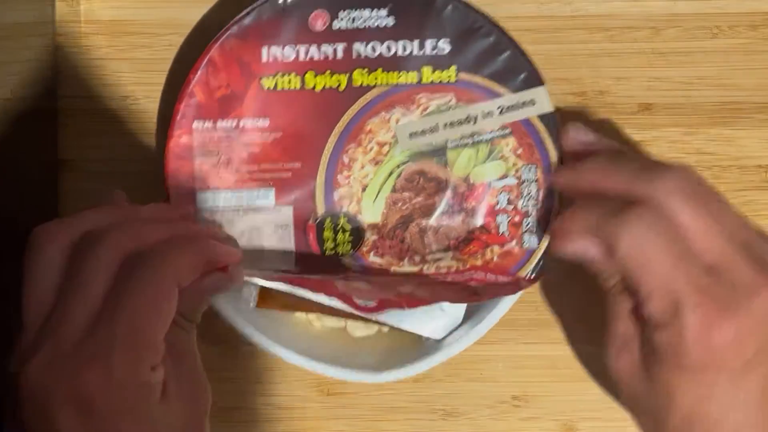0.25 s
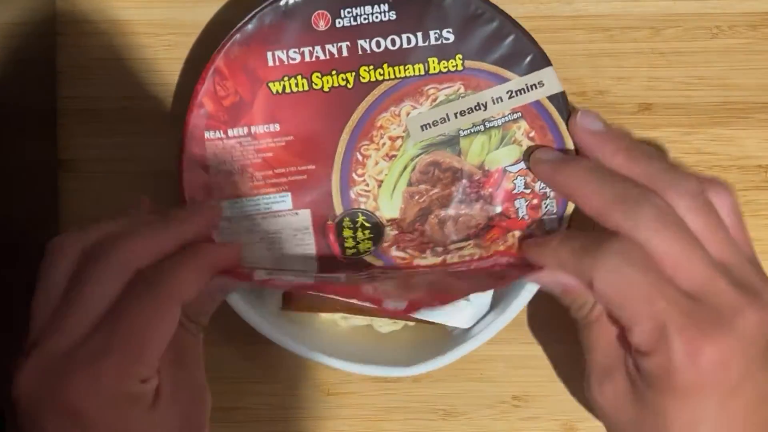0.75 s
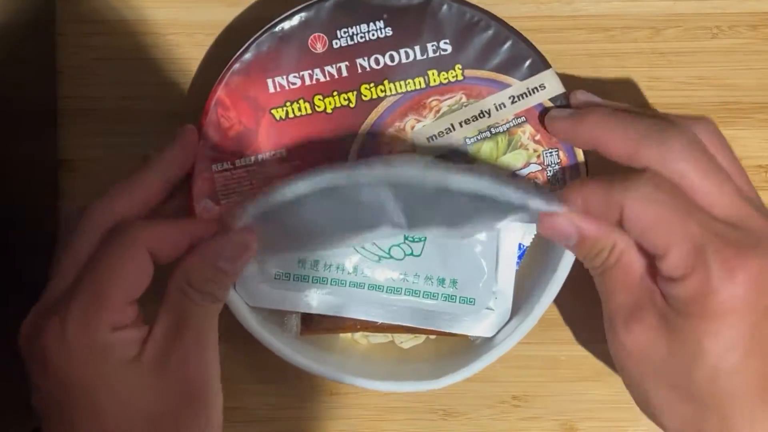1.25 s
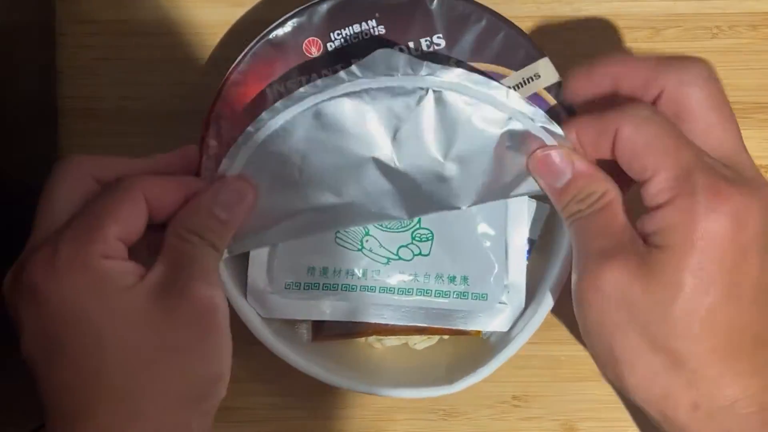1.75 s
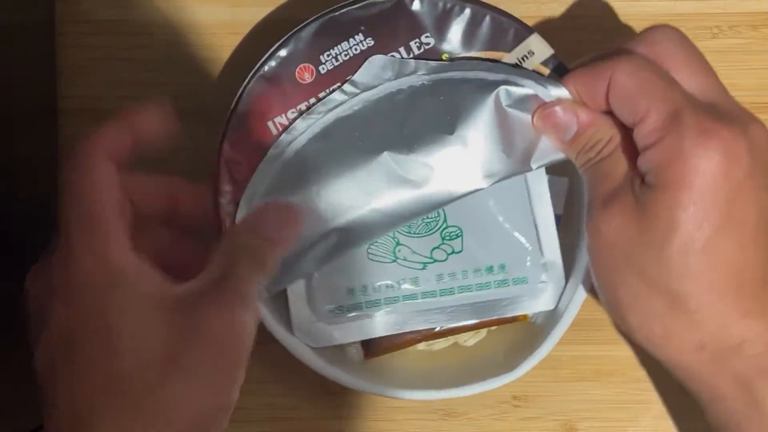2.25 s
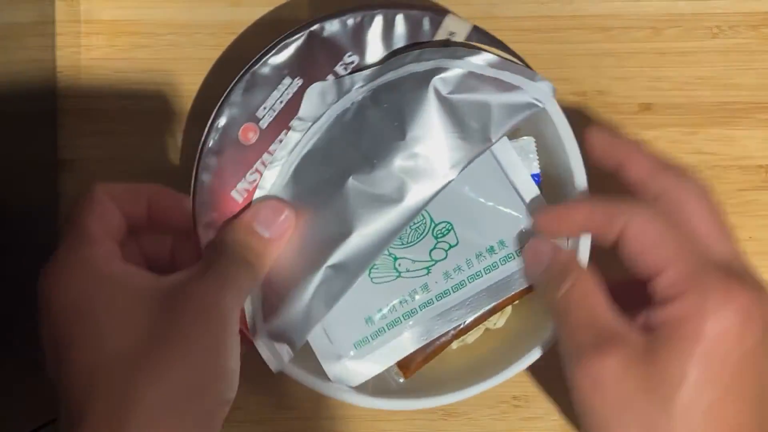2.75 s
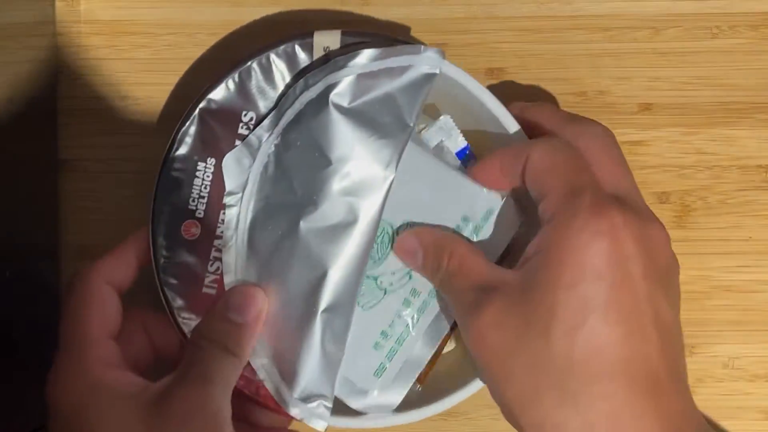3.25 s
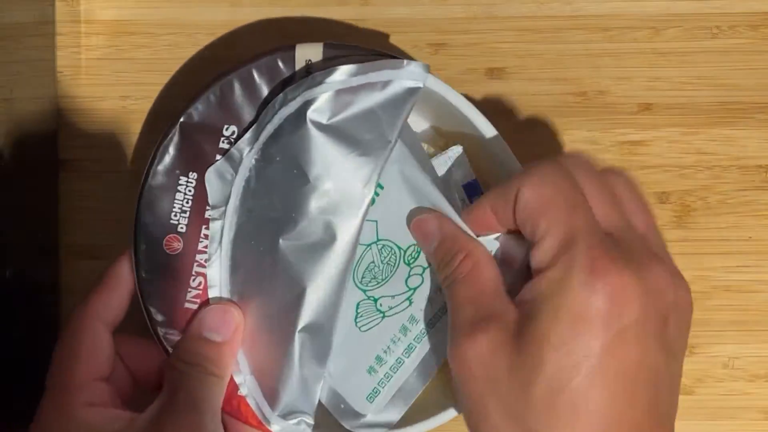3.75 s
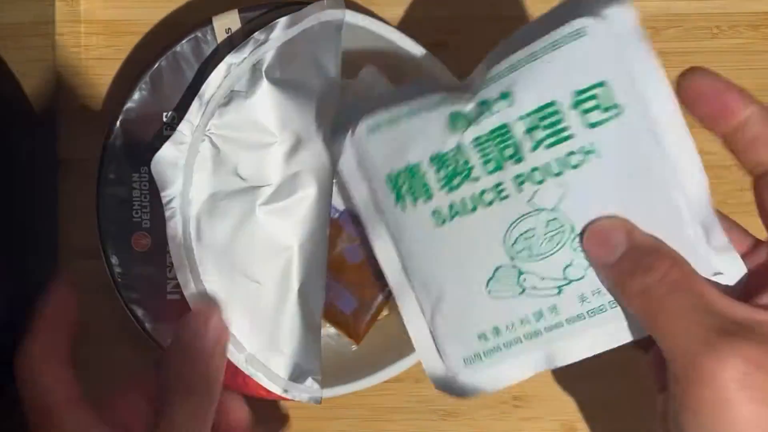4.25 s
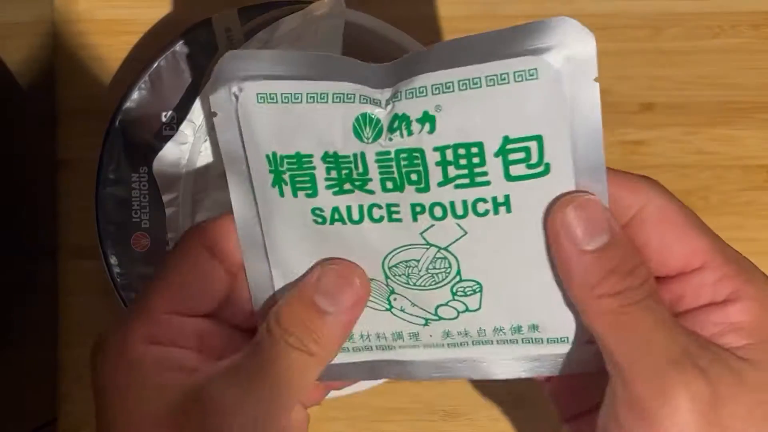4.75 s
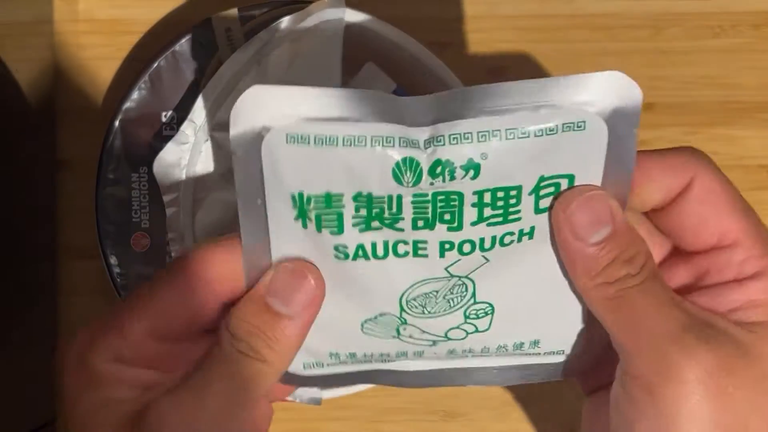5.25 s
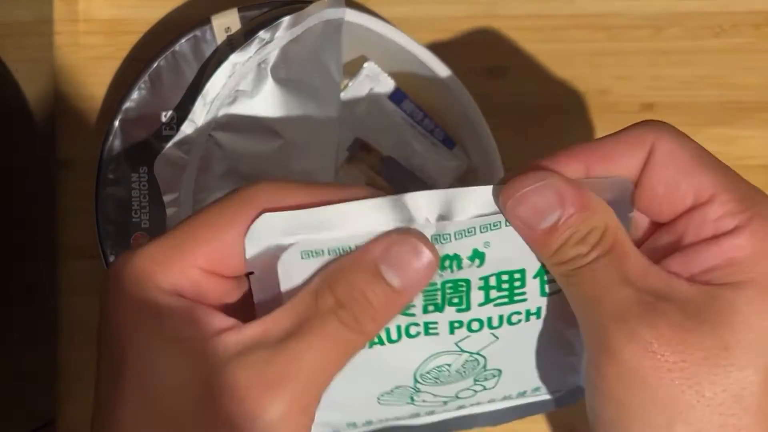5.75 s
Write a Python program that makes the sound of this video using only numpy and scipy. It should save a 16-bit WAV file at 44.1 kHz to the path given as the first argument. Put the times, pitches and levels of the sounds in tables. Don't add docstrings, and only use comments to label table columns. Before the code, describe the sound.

Close up on a wooden table, a foil-lined lid is peeled from a paper bowl: dense bright crackling, sharp snaps and dull hollow knocks. The bowl slides briefly as it is turned. A foil sachet is then pulled out in a loud crinkling burst and handled quietly with small ticks. Small dry room, faint low hum, close hand-held stereo microphone.

```python
import sys
import numpy as np
from scipy import signal
from scipy.fft import rfft, irfft, next_fast_len
from scipy.io import wavfile

SR = 44100
rng = np.random.default_rng(int(sys.argv[2]) if len(sys.argv) > 2 else 0)


def store_pcm(level_fs):
    pcm = np.round(np.clip(level_fs, -1, 1) * 32767).astype(np.int16)
    wavfile.write(sys.argv[1], SR, np.atleast_2d(pcm).T)


def volts_from_db(level):
    exponent = np.asarray(level, float) / 20
    return 10 ** exponent


N = 264159
PAD = next_fast_len(N + 2000)


def rms_one(x):
    return x / np.sqrt(np.mean(x ** 2) + 1e-20)


def coloured(x, points):
    hz, level_db = np.transpose(points)
    bins = np.arange(PAD // 2 + 1) * SR / PAD + 1
    gain = volts_from_db(np.interp(np.log(bins), np.log(hz), level_db, left=-90, right=-90))
    return rms_one(irfft(rfft(x, PAD) * gain, PAD)[:, :N])


def drift(rate):
    r = np.exp(-80 * np.pi * rate / SR)
    noise = rng.standard_normal(N // 40 + 2002)
    slow = signal.lfilter([1], [1, -2 * r, r * r], noise)[2000:]
    return np.interp(np.arange(N) / 40, np.arange(len(slow)), rms_one(slow))


def resonance(x, hz, width):
    r = np.exp(-np.pi * width / SR)
    top = np.array([1, 0, -1]) * (1 - r * r) / 2
    return signal.lfilter(top, [1, -2 * r * np.cos(2 * np.pi * hz / SR), r * r], x)


def crackle(per_s, spread_db, smear_s, clump_db):
    sizes = volts_from_db(2 * spread_db * np.minimum(rng.exponential(1, N), 3.2))
    born = rng.random(N) < per_s / SR
    fade = np.exp(-2 / (smear_s * SR))
    power = signal.lfilter([1], [1, -fade], sizes * born + 1e-18)
    return np.sqrt(power) * volts_from_db(clump_db * drift(23)) * rng.standard_normal((2, N))


def patchwork(edges_hz, per_s, spread_db, cycles, clump_db):
    out, together = 0, volts_from_db(clump_db * drift(29.4))
    for low, high in zip(edges_hz, edges_hz[1:]):
        band = signal.butter(1, [low, high], "band", fs=SR, output="sos")
        grains = rms_one(crackle(per_s, spread_db, cycles / low, clump_db))
        out = out + signal.sosfilt(band, grains)
    return out * together


# (frequency [Hz], density [dB per Hz])
RUMBLE = [(15, -17.5), (25, -17), (60, 6), (119, -7.5), (253, -10.5), (592, -21), (854, -22), (1700, -32),
          (2190, -28), (4990, -46), (8000, -51), (11000, -57), (13200, -70)]
# (frequency [Hz], width [Hz], level [dB])
MACHINES = [
    (51.3, 13.4, -62),
    (245.4, 6.6, -64.5),
]
RUMBLE_DB = -55


def room_tone():
    tone = volts_from_db(RUMBLE_DB + 0.54 * drift(6.8)) * coloured(rng.standard_normal((2, N)), RUMBLE)
    for hz, width, level_db in MACHINES:
        pitch = hz + 0.455 * width * drift(13.7)
        hum = rms_one(np.sin(2 * np.pi * np.cumsum(pitch) / SR))
        tone += volts_from_db(level_db) * hum * volts_from_db(2.0 * drift(9.0)) * [[1], [.1]]
    return tone


# (centre [s], half length [s], level [dB])
BOWL_SHIFTS = [
    (0.756, 0.055, -43),
    (1.814, 0.12, -59),
    (2.623, 0.042, -46),
    (2.706, 0.064, -56),
    (2.87, 0.36, -47.5),
    (3.174, 0.021, -42),
    (3.372, 0.012, -36.5),
    (3.552, 0.034, -51),
    (5.14, 0.12, -63),
]
# (frequency [Hz], width [Hz], level [dB])
BOWL_SLIDE_TONES = [
    (680, 360, -6),
    (2500, 1900, -9.5),
]


def shifts():
    t, white = np.arange(N) / SR, rng.standard_normal((2, N))
    tone = 0
    for hz, width, level_db in BOWL_SLIDE_TONES:
        tone = tone + volts_from_db(level_db) * rms_one(resonance(resonance(white, hz, width), hz, width))
    swell = sum(volts_from_db(db) * np.exp(-((t - s) / half_s) ** 2) for s, half_s, db in BOWL_SHIFTS)
    return tone * swell * volts_from_db(0.81 * drift(15))


# (time [s], rustle level [dB])
IDLE_GRIP = [(0, -62), (0.6, -45), (1.1, -46), (1.6, -49.5), (2.0, -54), (2.15, -52.5), (2.3, -58),
             (2.6, -56), (3.0, -50), (3.15, -61), (3.55, -56), (3.66, -67), (3.72, -60), (4.1, -63),
             (4.3, -50), (4.42, -65.5), (4.72, -68), (4.8, -77), (4.9, -71), (4.95, -78), (5.03, -84),
             (5.05, -68), (5.4, -70), (5.7, -60.5), (5.99, -59)]
# (centre [s], half length [s], rustle level [dB], fingertip hiss re rustle [dB])
PEEL_STROKES = [(0.0, 0.22, -42.5, -18), (0.235, 0.074, -28, -18), (0.438, 0.048, -40.5, -16.5),
                (0.816, 0.094, -30.5, -17.5), (0.848, 0.054, -27.5, -16.5), (0.891, 0.035, -30.5, -17),
                (1.29, 0.25, -41.5, -37), (1.393, 0.24, -38, -15.5), (1.631, 0.082, -45.5, -13.5),
                (1.776, 0.057, -35, -38), (1.851, 0.18, -39.5, -25.5), (2.17, 0.069, -40, -22.5),
                (2.43, 0.1, -40, -19), (2.455, 0.063, -39, -19), (2.64, 0.11, -43.5, -36),
                (2.85, 0.21, -52, -20)]
# (centre [s], half length [s], rustle level [dB], fingertip hiss re rustle [dB])
TURN_STROKES = [(3.268, 0.092, -36, -27), (3.426, 0.1, -38, -28), (3.73, 0.03, -46, -20),
                (3.775, 0.1, -39, -25), (3.826, 0.06, -32, -22), (3.929, 0.056, -22.5, -22.5),
                (4.0, 0.023, -37, -26), (4.07, 0.12, -40.5, -42), (4.15, 0.06, -52, -5.5),
                (4.228, 0.046, -44, -25), (4.62, 0.07, -59.5, -7), (4.869, 0.05, -62, -12),
                (5.08, 0.04, -64, -8), (5.13, 0.07, -64.5, -7.5), (5.175, 0.04, -64, -10),
                (5.251, 0.016, -58, -6.5), (5.385, 0.031, -68.5, 2), (5.51, 0.036, -71, 1),
                (5.59, 0.13, -51, -25), (5.75, 0.0094, -46.5, -35), (5.909, 0.052, -48, -12)]
STROKE_FALL_DB, STROKE_SHAPE = 15.5, 1.28
GRIP_HISS_DB = -20.5


def hands():
    t = np.arange(N) / SR
    rustle_power = volts_from_db(2 * np.interp(t, *np.transpose(IDLE_GRIP)))
    hiss_power = rustle_power * volts_from_db(2 * GRIP_HISS_DB)
    for s, half_s, level_db, hiss_db in PEEL_STROKES + TURN_STROKES:
        near = slice(max(round((s - .4) * SR), 0), round((s + .4) * SR))
        distance = np.abs((t[near] - s) / half_s)
        swell = volts_from_db(2 * (level_db - STROKE_FALL_DB * distance ** STROKE_SHAPE))
        rustle_power[near] += swell
        hiss_power[near] += swell * volts_from_db(2 * hiss_db)
    return 10 * np.log10(rustle_power), 10 * np.log10(hiss_power)


# (frequency [Hz], level [dB])
FOIL_COLOUR = [(700, -18.5), (1200, 5), (2200, 14.5), (3200, 10), (4500, 3), (6000, 1.5), (8000, -5.5),
               (12000, -63.5)]
# (frequency [Hz], level [dB])
BOWL_COLOUR = [(130, 2.5), (250, 3), (430, 2), (650, 2), (900, 0), (1300, 0.5), (2000, -4.5)]
# (frequency [Hz], level [dB])
SKIN_COLOUR = [(3000, 3.5), (5000, 2), (8000, 2), (11000, -2), (14000, 0.5), (16000, -6.5)]
RUB_DB, RUB_FOLLOWS = -50, 0.75


def rustle():
    foil_db, skin_db = hands()
    bowl_db = RUB_DB + RUB_FOLLOWS * (foil_db + 49.5)
    folds = patchwork([700, 1300, 2100, 3200, 4800, 7500, 12000], 780, spread_db=9.0, cycles=27.0, clump_db=1.5)
    rubbing = patchwork([130, 350, 600, 1000, 2000], 280, spread_db=3.5, cycles=4.1, clump_db=2.5)
    sliding = crackle(3200, spread_db=-6.5, smear_s=0.003, clump_db=2.5)
    foil = volts_from_db(foil_db - 7.0) * coloured(folds, FOIL_COLOUR)
    bowl = volts_from_db(bowl_db - 5.0) * coloured(rubbing, BOWL_COLOUR)
    skin = volts_from_db(skin_db + 7.5) * coloured(sliding, SKIN_COLOUR)
    return foil + bowl + skin


# (centre [s], half length [s], level [dB], centre frequency [Hz])
SQUEEZES = [(0.14, 0.019, -45, 890), (0.21, 0.025, -64, 2600), (0.398, 0.016, -43.5, 1440),
            (0.43, 0.018, -48.5, 2300), (1.012, 0.013, -42, 2720), (1.273, 0.032, -53, 2100),
            (1.344, 0.007, -44.5, 3100), (2.198, 0.028, -56, 2600), (3.178, 0.016, -40, 3100),
            (3.246, 0.0055, -28.5, 1150), (3.245, 0.009, -36, 2900), (3.425, 0.032, -38, 1250),
            (3.818, 0.019, -41, 4220), (4.037, 0.031, -38.5, 1650), (3.901, 0.0037, -28, 2400),
            (3.934, 0.014, -32.5, 900), (3.96, 0.0047, -40.5, 2800), (0.777, 0.0062, -40, 2700),
            (0.722, 0.018, -37.5, 550), (0.84, 0.029, -36.5, 620), (0.887, 0.008, -38, 700),
            (1.028, 0.0093, -38, 2000), (0.126, 0.018, -42.5, 540), (3.398, 0.029, -40, 1970),
            (3.544, 0.015, -46.5, 1450), (1.28, 0.023, -38, 1800), (2.565, 0.012, -46, 1800),
            (4.208, 0.017, -42.5, 1600), (1.776, 0.027, -46, 2200), (1.784, 0.0086, -48, 730),
            (2.168, 0.015, -50, 2000), (3.828, 0.024, -45.5, 4230), (4.328, 0.0089, -54.5, 2100),
            (5.583, 0.01, -53, 1170), (0.28, 0.0068, -41, 1900), (5.561, 0.008, -43.5, 770),
            (1.402, 0.012, -38.5, 2200), (5.9, 0.019, -50.5, 1300), (0.213, 0.0074, -34, 660),
            (3.26, 0.012, -39, 2300), (4.18, 0.013, -56, 1960), (4.665, 0.0039, -42, 1470),
            (5.077, 0.015, -62.5, 4230), (5.538, 0.0077, -45, 1400), (5.857, 0.032, -56.5, 5100),
            (2.82, 0.035, -50, 3000), (2.94, 0.03, -52, 2600), (2.59, 0.02, -45, 600),
            (1.299, 0.004, -31, 1900), (5.868, 0.005, -50, 5000), (2.8, 0.07, -55, 1400),
            (3.62, 0.04, -62, 1200), (2.58, 0.012, -40, 2300), (3.385, 0.015, -46, 2200),
            (3.246, 0.008, -39, 5800)]


def crumples():
    t, out = np.arange(N) / SR, np.zeros((2, N))
    swarm = rms_one(crackle(770, spread_db=2.5, smear_s=0.0028, clump_db=4.5))
    for s, half_s, level_db, centre_hz in SQUEEZES:
        near = slice(round((s - .08) * SR), round((s + .08) * SR))
        swell = np.exp(-((t[near] - s) / half_s) ** 2)
        burst = resonance(swarm[:, near], centre_hz, 0.49 * centre_hz) * swell
        out[:, near] += volts_from_db(level_db) * rms_one(burst) * np.sqrt(np.mean(swell ** 2))
    return out


# (time [s], peak [dB], bowl pitch [Hz], bowl re peak [dB], foil pitch [Hz])
LID_BUCKLES = [(0.203, -23.5, 540, -11.5, 970), (0.276, -24, 537, -45, 2050),
               (0.386, -32.5, 420, -19, 1400), (0.502, -31, 829, -34, 2500), (0.58, -31.5, 840, -22, 1210),
               (0.626, -35.5, 610, -11, 946), (0.817, -28, 613, -9.5, 2190), (1.004, -19, 291, -24, 1270),
               (1.253, -13, 650, -34, 3350), (1.296, -17, 656, -20.5, 1850), (1.307, -37, 680, 3, 2900),
               (1.38, -32.5, 477, -7, 2480), (1.393, -21.5, 500, -14.5, 2400),
               (1.568, -29.5, 533, -15, 1470), (1.815, -31, 850, -18, 2220), (2.124, -33.5, 516, -23, 2400),
               (2.147, -22.5, 500, -21.5, 2270), (2.357, -38, 660, -21, 2320),
               (2.463, -25.5, 510, -14, 1230), (2.491, -34, 330, -16, 2200), (2.566, -9, 672, -11.5, 2020)]
# (time [s], peak [dB], bowl pitch [Hz], bowl re peak
# [dB], foil pitch [Hz])
SACHET_BUCKLES = [(3.243, -22, 774, -10, 1310), (3.522, -35.5, 315, -23, 2120), (3.69, -46, 756, -9, 2860),
                  (3.765, -13.5, 576, -20, 2330), (3.872, -21.5, 607, -21, 3000),
                  (3.887, -18, 666, -16.5, 2760), (3.897, -17, 650, -13.5, 1020),
                  (3.933, -16.5, 980, -22, 1340), (3.951, -26, 790, -31, 2820),
                  (3.831, -46, 474, -24, 1240), (4.146, -16, 510, -37, 2160),
                  (4.183, -27.5, 443, -22.5, 1980), (4.203, -31, 950, -51, 1520),
                  (4.313, -36.5, 810, -35, 1420), (4.487, -36, 332, -21.5, 1180),
                  (4.661, -38.5, 920, -6.5, 1170), (5.117, -41, 464, -21.5, 1210),
                  (5.161, -37.5, 960, -19, 1220), (1.255, -17.5, 664, -25.5, 1310),
                  (5.553, -22, 700, -19, 1210), (5.61, -35, 810, -12.5, 1230), (5.797, -44, 410, -20, 1300),
                  (5.887, -29.5, 406, -25, 1480)]
# (time [s], peak [dB], bowl pitch [Hz], bowl re peak [dB], foil pitch [Hz])
EDGE_CRACKS = [(0.202, -23.5, 1000, -8.5, 2320), (0.429, -31, 600, -16, 950), (0.624, -36.5, 850, -9, 2260),
               (0.834, -27.5, 427, -7, 1890), (1.328, -9.5, 690, -29.5, 2830),
               (1.622, -32, 296, -19.5, 2620), (1.757, -33, 800, -12, 1860), (2.567, -17.5, 415, -8, 4540),
               (2.996, -36, 393, -12.5, 1959), (3.167, -29, 630, -23, 2800), (3.406, -19.5, 453, -21, 1521),
               (3.723, -31.5, 380, -16.5, 2860), (3.925, -19, 554, -13.5, 2500),
               (5.246, -43.5, 355, -21, 1190), (5.372, -48.5, 312.5, -15.5, 953),
               (5.404, -50.5, 320, -9, 2440), (5.715, -45, 960, -15, 2800), (5.865, -36, 939, -35, 3700)]
# (time [s], peak [dB], bowl pitch [Hz], bowl re peak [dB])
LID_THUMPS = [(0.038, -49.5, 363, 2.5), (0.118, -47, 553, -7), (0.233, -32, 570, -1.5),
              (0.663, -51.5, 380, 6), (0.71, -47, 533, 3.5), (0.753, -38, 414, -0.5),
              (1.089, -54.5, 570, 5.5), (1.127, -50.5, 555, 7.5), (1.201, -58.5, 740, 13.5),
              (1.475, -35, 670, -8.5), (1.603, -46.5, 298, 0), (1.676, -44, 590, 1.5),
              (1.845, -25, 285, -11.5), (1.846, -30, 750, -6), (1.857, -36.5, 302, -1.5),
              (1.87, -45, 300, -4), (1.53, -51, 500, 0), (1.912, -35.5, 480, 3), (2.182, -42.5, 370, -4.5),
              (2.416, -22, 500, -7), (3.199, -33.5, 470, -11), (3.354, -33.5, 503, -10.5),
              (3.644, -47, 289, -14), (5.897, -40.5, 483, -1.5), (5.946, -49.5, 320, -1.5)]
# (time [s], peak [dB], foil pitch [Hz])
SACHET_TICKS = [(4.401, -66, 1560), (4.62, -42.5, 1270), (4.74, -43.5, 1214), (4.851, -48, 970),
                (4.885, -54, 956), (4.96, -49, 1130), (5.221, -48.5, 1040), (5.256, -45, 1150),
                (5.474, -42.5, 1160), (5.748, -44, 1100), (5.837, -49, 2650)]
# (time [s], peak [dB], foil pitch [Hz])
FACET_FLIPS = [(0.151, -30.5, 3500), (0.192, -36, 1100), (0.204, -23.5, 3200), (0.277, -26, 3540),
               (0.58, -37, 2500), (0.819, -31, 1200), (0.838, -33, 3000), (0.886, -27, 1500),
               (0.898, -41, 2800), (1.005, -22, 3450), (1.329, -12, 4700), (1.33, -18, 3720),
               (1.334, -21, 1920), (3.873, -21.5, 1090), (3.887, -31, 3600), (3.935, -19, 3150),
               (4.032, -29, 2200), (4.084, -34, 1980), (4.147, -17.5, 1020), (4.153, -31, 3700),
               (5.535, -34.5, 2700), (5.544, -36, 2600), (5.555, -36, 3380), (5.654, -49, 1230),
               (5.733, -49, 1400), (5.749, -43, 2620), (5.866, -43, 1400), (5.887, -35, 4140),
               (5.888, -31.5, 2700), (5.966, -50, 2670), (1.844, -32, 3000), (2.148, -38, 3800),
               (3.244, -24, 2580), (3.766, -19, 1510), (3.767, -20, 3350), (3.831, -29, 1300),
               (4.147, -21, 2150), (4.651, -40, 1100), (4.662, -35.5, 2770), (4.851, -54.5, 2300),
               (4.91, -50.5, 1900), (5.162, -45, 2600), (5.555, -28, 2250), (5.496, -59, 3500)]
# (time
# [s], peak [dB], pitch [Hz])
SLIPS_AND_FLIPS = [(0.714, -40, 9000), (1.227, -41, 8500), (1.238, -38, 8890), (1.254, -27.5, 8000),
                   (1.328, -16, 8700), (1.577, -41, 9400), (1.725, -46, 10000), (1.738, -41, 10000),
                   (1.861, -40, 8500), (2.124, -42, 10000), (2.182, -38, 9000), (3.354, -46, 9000),
                   (3.708, -50, 8000), (3.766, -30.5, 8810), (3.821, -35.5, 9600), (3.898, -37, 10000),
                   (3.924, -21, 9100), (4.146, -40, 10000), (3.406, -32, 8800), (5.716, -50, 9500),
                   (3.616, -60, 9000), (0.427, -44, 9500), (0.625, -44, 9500), (1.004, -36, 9500),
                   (2.566, -30, 9500), (3.168, -42, 9500), (4.662, -50, 9000), (5.866, -48, 9500),
                   (1.912, -40, 2100), (2.414, -36, 2300), (2.461, -38, 1500), (5.425, -56, 2700),
                   (2.566, -20, 6000), (1.328, -18, 6000), (0.862, -30, 2600), (0.808, -35, 3000),
                   (0.91, -36, 2200), (0.225, -34, 2400), (0.248, -35, 3300), (0.77, -38, 3800)]
SNAP_DAMPING, THUMP_DAMPING = 0.22, 0.3


def creases():
    lid = [(*row, -61, SNAP_DAMPING) for row in LID_BUCKLES]
    sachet = [(*row, -36, SNAP_DAMPING) for row in SACHET_BUCKLES]
    cracks = [(*row, 3.5, SNAP_DAMPING) for row in EDGE_CRACKS]
    thumps = [(*row, 2050, -26, THUMP_DAMPING) for row in LID_THUMPS]
    ticks = [(s, db, 305, -16, hz, -21, SNAP_DAMPING) for s, db, hz in SACHET_TICKS]
    flips = [(s, db, 500, -32, hz, -26.5, SNAP_DAMPING) for s, db, hz in FACET_FLIPS + SLIPS_AND_FLIPS]
    return lid + sachet + cracks + thumps + ticks + flips


CLEAN_BREAK = 0.2


def snaps():
    size, rows = 4096, creases()
    t = np.arange(size) / SR
    jump = (1 - np.exp(-t / 0.00051)) * np.exp(-t / 0.0013)
    shiver = volts_from_db(-4.5) * (1 - np.exp(-t / 0.00095)) * np.exp(-t / 0.0049)
    kick = 0.8 * np.exp(-((t - .0016) / 0.000545) ** 2)
    edge_filter = signal.butter(2, [3800, 6800], "band", fs=SR, output="sos")
    draws = rng.standard_normal((len(rows), 3, size))
    noise, out = draws[:, :2], np.zeros((2, N + size))
    lumps = np.repeat(volts_from_db(3 * draws[:, 2, ::128]), 128, axis=1)
    for (s, peak_db, bowl_hz, bowl_db, foil_hz, edge_db, damping), white, lump in zip(rows, noise, lumps):
        shiver_loss_db = CLEAN_BREAK * max(peak_db + 30.0, 0)
        push = white * (jump + shiver * lump * volts_from_db(-shiver_loss_db))
        flip = resonance(np.diff(kick ** 6, prepend=0), foil_hz, foil_hz) * [[1], [0]]
        sheet_filter = signal.butter(2, [0.5 * foil_hz, 1.68 * foil_hz], "band", fs=SR, output="sos")
        foil = 3.9 * resonance(push + 36.7 * flip, foil_hz, 380) + signal.sosfilt(sheet_filter, push)
        bowl = resonance(push + kick * [[1], [.14]], bowl_hz, damping * bowl_hz)
        bowl = resonance(bowl, bowl_hz, 0.97 * bowl_hz)
        edge = signal.sosfilt(edge_filter, push) + 0.11 * np.diff(push, prepend=0)
        foil, bowl, edge = (v / np.abs(v).max(axis=1, keepdims=True) for v in (foil, bowl, edge))
        snap = volts_from_db(-1.0) * foil + volts_from_db(bowl_db + 10.0) * bowl + volts_from_db(edge_db - 9.5) * edge
        at = round(s * SR)
        out[:, at:at + size] += volts_from_db(peak_db) * snap
    return out[:, :N]


ROOM_T60_S, ROOM_DB = 0.13, -14.5


def walls(x):
    t = np.arange(SR // 2) / SR
    tail = rng.standard_normal((2, len(t))) * volts_from_db(-60 * t / ROOM_T60_S) * (t > .006)
    tail = signal.lfilter([1], [1, -.5], tail)
    tail = tail / np.sqrt((tail ** 2).sum(axis=1, keepdims=True))
    return signal.fftconvolve(x[:1], tail, axes=1)[:, :N]


# (frequency [Hz], lead of the left [rad])
PORT_LEAD = [(0, 0), (1300, .2), (1800, 1.2), (2300, 0), (3000, -.4), (3900, -.15), (5150, -.15),
             (5300, 2.1), (6400, 2.2), (7230, np.pi), (7550, 3.7), (7950, 4.6), (8950, 5.93),
             (9600, 2 * np.pi), (12150, 9.0), (12750, 3 * np.pi), (13450, 9.85), (15520, 4 * np.pi),
             (16200, 14)]
# (frequency [Hz], likeness [0..1])
PORT_LIKENESS = [(0, 1), (150, .95), (400, .89), (900, .62), (1700, .35), (2500, .88), (3900, .99),
                 (5050, .99), (5250, .7), (6400, .75), (7000, 1), (7550, 1), (8100, .85), (8800, 1),
                 (10200, 1), (11000, .9), (12000, 1), (13600, 1), (14300, .85), (15200, 1)]
# (frequency [Hz], left minus right [dB])
PORT_TILT = [(0, 0), (300, -1), (700, 0), (1300, 0), (2000, 5.5), (3000, .8), (4000, 0)]


def ports(paths, treble_loss):
    hz = np.arange(PAD // 2 + 1) * SR / PAD
    alike = np.interp(hz, *np.transpose(PORT_LIKENESS)) * (1 - treble_loss * (hz > 6000))
    lead = np.interp(hz, *np.transpose(PORT_LEAD))
    tilt_db = np.interp(hz, *np.transpose(PORT_TILT))
    turn = np.exp(.5j * lead) * volts_from_db(.5 * tilt_db)
    shared, scattered = rfft(paths, PAD) * np.sqrt([(1 + alike) / 2, (1 - alike) / 2])
    return irfft([(shared + scattered) * turn, (shared - scattered) / turn], PAD)[:, :N]


def scene():
    steady, distant = rustle() + crumples(), room_tone() + shifts()
    sudden = snaps()
    around = volts_from_db(ROOM_DB) * walls(steady + sudden) + distant
    return ports(steady + around, treble_loss=0) + ports(sudden, treble_loss=0.06)


def band_limit(x):
    return signal.sosfilt(signal.butter(12, 16990, fs=SR, output="sos"), x)


def record(dry):
    top_cut = signal.cheby2(12, 36, 16000, fs=SR, output="sos")
    mix = signal.sosfilt(top_cut, dry)
    return band_limit(mix)


dry = scene()
out = record(dry)
store_pcm(out)
```